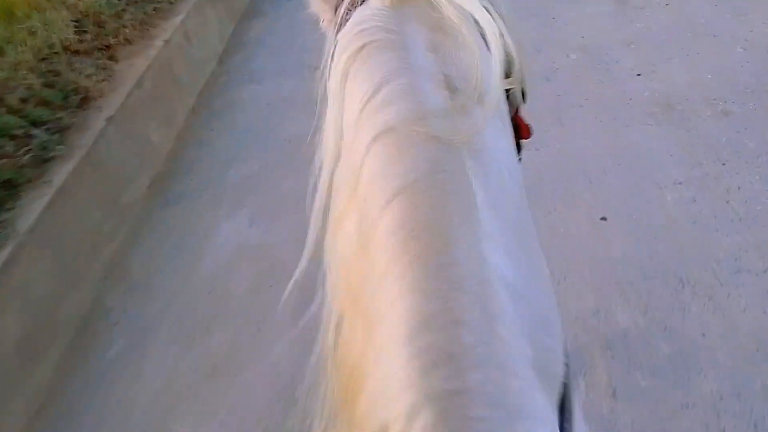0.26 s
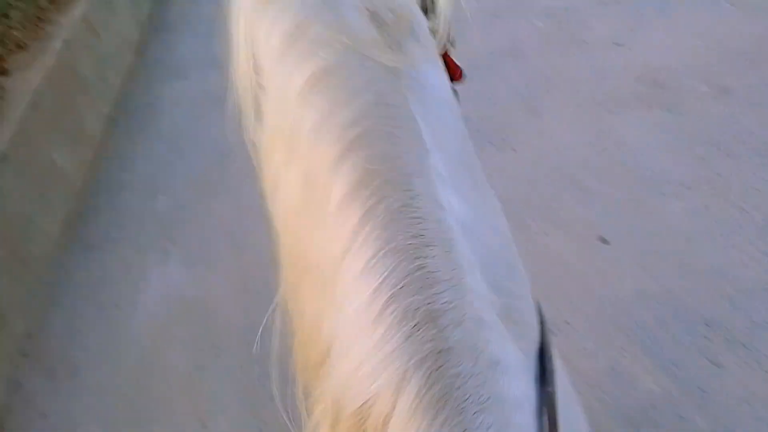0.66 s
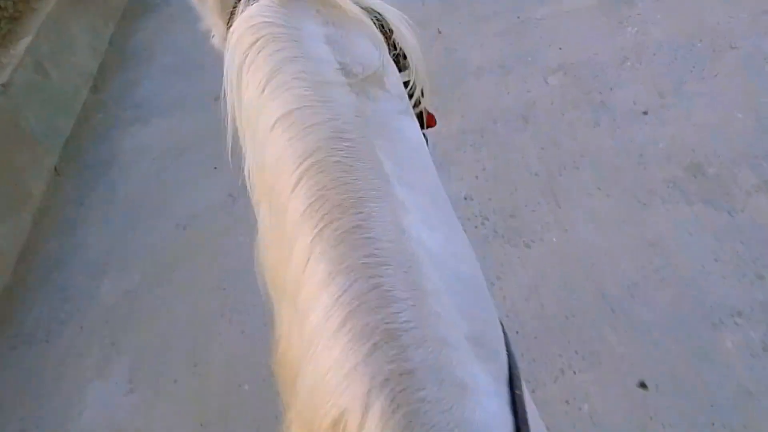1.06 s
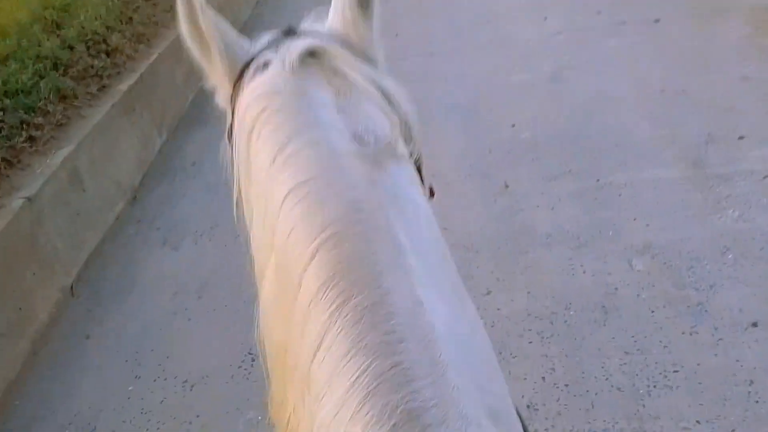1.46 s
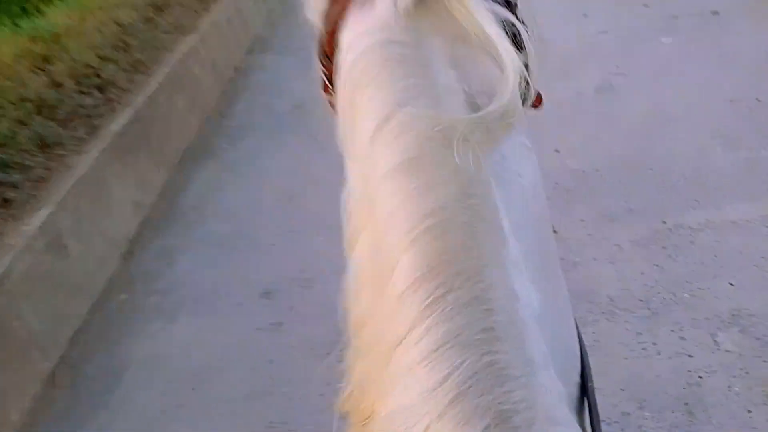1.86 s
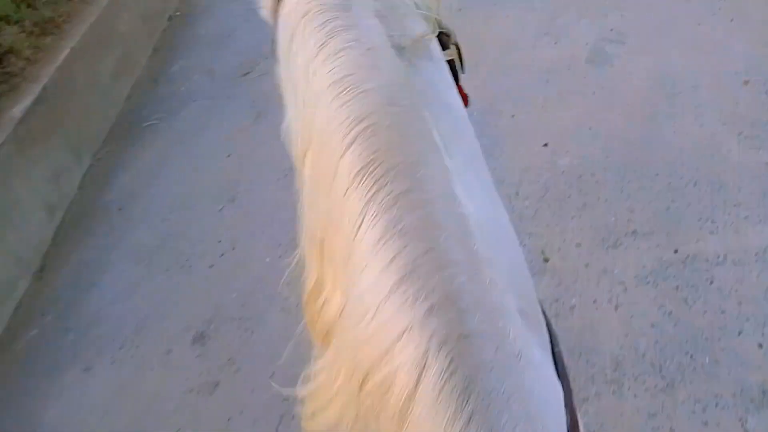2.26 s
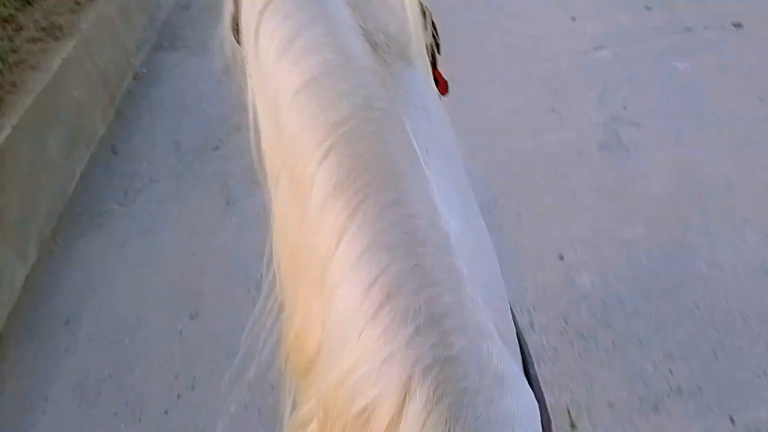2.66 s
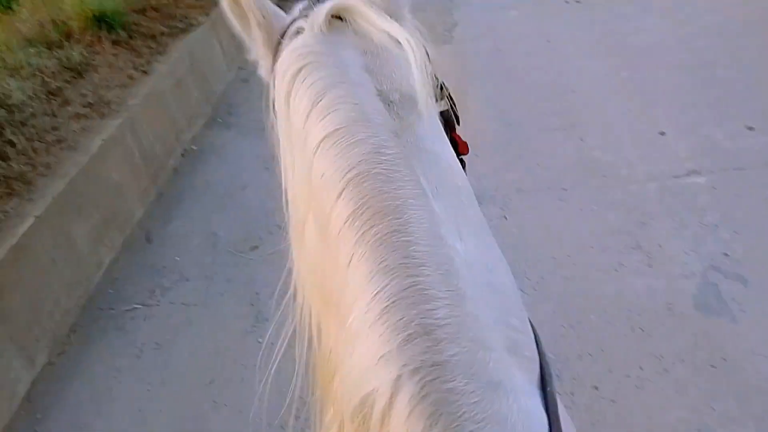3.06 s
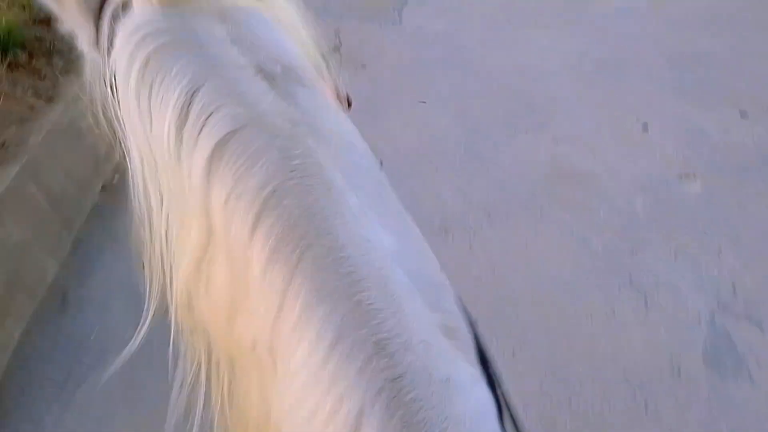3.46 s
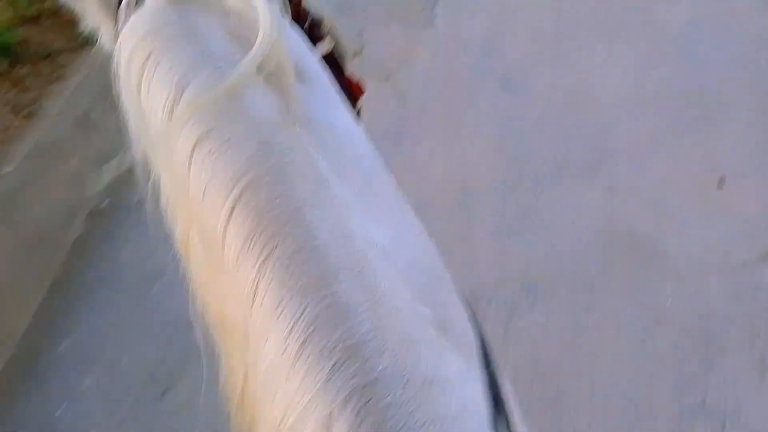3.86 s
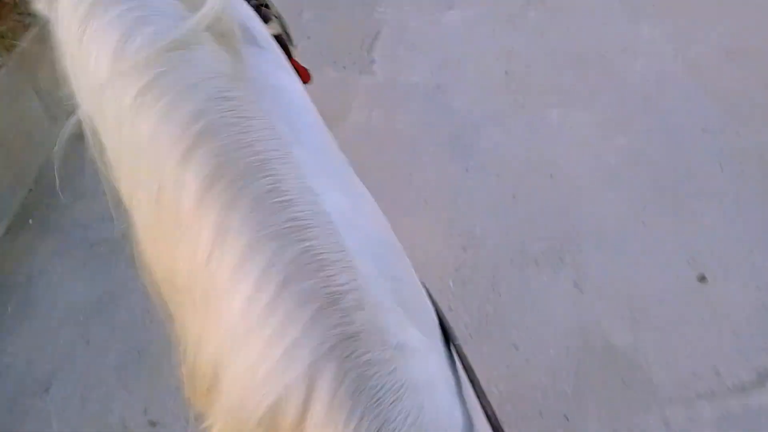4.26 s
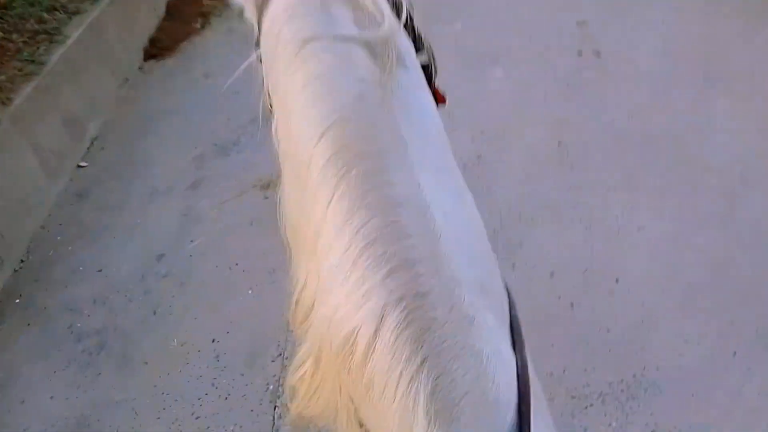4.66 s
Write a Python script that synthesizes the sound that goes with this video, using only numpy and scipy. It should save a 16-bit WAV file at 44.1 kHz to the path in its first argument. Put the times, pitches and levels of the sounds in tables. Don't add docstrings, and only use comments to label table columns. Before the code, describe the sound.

A walking horse's hard hollow hoof clicks over a low puttering engine that slows, then throttles up near the end, amid thumping wind.

```python
import sys
import numpy as np
from scipy import signal
from scipy.fft import rfft, irfft, next_fast_len
from scipy.io import wavfile
from scipy.ndimage import uniform_filter1d

SR = 44100
rng = np.random.default_rng(int(sys.argv[2]) if len(sys.argv) > 2 else 0)


def convert_level_to_amplitude(level_db):
    exponent = np.asarray(level_db, float) / 20
    return 10 ** exponent


def to_wav(sig):
    pcm = np.clip(np.atleast_2d(sig), -1, 1) * 32767
    pcm = np.round(pcm).astype(np.int16)
    wavfile.write(sys.argv[1], SR, pcm.T)


N = 212601
T = np.arange(N) / SR

# start_s, peak_db, ring_hz, hollow_knock_db,
# shoe_edge_db
HOOF_BLOWS = [(0.014, -16, 924, -2.5, -13), (0.189, -16, 850, -1, -35), (0.477, -18, 1160, 0.5, -7),
              (0.944, -16.5, 1020, 5, -2.5), (0.994, -33, 1200, -12, -29), (1.426, -15, 1120, -2.5, -31),
              (1.446, -19, 990, -3, -5), (1.865, -10.5, 1032, 0.5, -8.5), (2.314, -11, 1125, -6, -6.5),
              (2.365, -16.5, 960, -10.5, -4), (2.78, -11, 1040, -5, -41), (3.234, -15.5, 970, 2, -30),
              (3.275, -12, 904, -16.5, -28), (3.687, -11, 990, -2.5, -28), (3.811, -23.5, 800, -11, -24),
              (4.144, -16.5, 936, 2, -15), (4.191, -15, 884, -36.5, -36), (4.609, -21.5, 910, -24, -15.5),
              (2.809, -32, 1000, -16, -30)]
# start_s, peak_db, hollow_knock_db, shoe_edge_db
HOOF_TOUCHES = [(0.106, -35, 9.5, 1), (0.216, -31, 10, 5), (0.53, -27.5, 9, 4), (0.654, -27.5, 11.5, -5),
                (0.685, -24, 3, -6), (0.708, -26.5, -7, -19), (1.088, -40.5, 11, 4), (1.118, -20, -8, -9),
                (1.236, -33, 15.5, -22), (1.281, -28.5, 6.5, 2.5), (1.396, -23.5, 2, -8),
                (1.577, -28, 15, 1), (1.924, -41, 14.5, 1), (2.007, -25, 3.5, -29), (2.455, -30.5, 7, -7),
                (2.657, -24, -7, -5), (2.679, -32.5, 10, -12), (2.699, -24.5, 0, -5.5),
                (2.715, -47, -9, -6), (2.876, -39, 11, -4), (3.035, -26, 2, 0.5), (3.344, -29.5, 8, -19),
                (4.051, -25.5, -12, -1.5), (4.107, -25, -3, -3), (4.282, -23, 0, -8), (4.329, -22, -10, -7)]
RING_T60_S, RING_T60_S_PER_DB = .0068, .0001
TOUCH_HZ, TOUCH_T60_S = 790, 0.0057

# time_s, firings_hz
ENGINE_SPEED = [(0, 34.97), (.6, 32.89), (1.2, 31.85), (2, 29.53), (2.7, 27.96), (2.95, 26.78),
                (3.5, 25.76), (4.03, 25.52), (4.1, 29.9), (4.3, 25.5), (4.55, 25.5), (4.82, 26.1)]
# time_s,
# centre_hz
BOOM_CENTRE = [(0, 136), (.8, 131), (2.6, 114), (3, 122), (3.8, 128), (4.05, 126), (4.2, 149),
               (4.38, 143), (4.6, 140), (4.82, 138)]
# time_s, gain_db
NEARNESS = [(0, -5), (.4, 0), (1.3, -0.5), (2.3, 0), (2.7, -3), (3.05, 0), (3.4, 3), (4, 3.5), (4.4, 4),
            (4.7, 6), (4.82, 7.5)]
# far_level_db, nearness_share (ratio), throttle_gain_db
ENGINE_LAYERS = [
    (-23, 0.94, 7),
    (-32.5, 1.49, 3.5),
    (-36.5, 0.73, 13),
    (-49.5, 2.2, 10),
    (-52.5, 1.97, 6),
]
WEAK_FIRINGS = (3.385, 3.502, 3.62, 3.812, 3.93, 4.047)
WEAK_DB = -8
THROTTLE_S, THROTTLE_RISE_S = 4.06, .1
SWELL_S, SWELL_WIDTH_S, SWELL_DB = 2.31, 0.54, 4.5
SILENCER_HZ, SILENCER_WIDTH_HZ = 309.5, 40.4
# frequency_hz, density_db (per Hz)
CLATTER_COLOUR = [(300, -1), (600, -10.5), (760, -13.0), (930, -0.5), (1200, -13), (1650, -23),
                  (2100, -5.0), (2750, -9.0), (3300, -18.0), (4300, -22.5), (5500, -29.5), (7000, -39.5),
                  (9000, -49), (11000, -37), (15500, -62)]
# frequency_hz, density_db (per Hz)
SNAP_COLOUR = [(3000, -28.5), (4500, -18.5), (5700, 4.5), (7000, -6.5), (9500, -1.5), (12000, -7.5),
               (16000, -22.5)]
# time_s, pitch_hz, level_db
GEAR_WHINE = [
    (2.799, 930, -57.5),
    (3.2, 930, -67),
    (3.4, 918, -45.5),
    (3.7, 913, -47),
    (4, 923, -47.5),
    (4.1, 830, -58),
]

SONG_ANCHORS = [
    (.006, .192, .444, .795, 1.277, 1.871, 1.995, 2.236, 2.78),
    (.713, 1.376, 1.747, 2.193, 2.815, 2.878, 3.366, 3.965, 4.03, 4.333),
    (3.824, 4.382),
    (4.543, 4.79),
]
SONG_LEVELS = [
    (-51.5, -54, -53.5, -54.5, -57.5, -60, -57, -59.5, -66),
    (-64, -64, -64.5, -62, -64.5, -59, -60.5, -60, -56, -60.5),
    (-68, -73),
    (-63.5, -67),
]
PAIR_S, STROKE_GAP_S = .061, .02
LOW_END_S, LOW_END_WIDTH_S, LOW_END_DB = 1.5, 0.41, 8

# start_s, peak_db, length_s, bright_ping_db
GRIT_SCUFFS = [(0.392, -33, 0.014, -21), (0.4, -20.5, 0.0041, -27), (0.412, -40.5, 0.026, -32),
               (0.5246, -33, 0.0052, -25.5), (0.654, -41.5, 0.056, -22), (0.953, -31.5, 0.0067, -27.5),
               (1.8164, -44, 0.008, -11), (2.0255, -39.5, 0.027, -12), (2.039, -37, 0.006, -17),
               (2.3215, -39, 0.017, -17), (2.344, -41, 0.03, -19), (2.5016, -40, 0.021, -9),
               (2.7828, -34.5, 0.017, -23), (3.2494, -45, 0.013, -18), (3.5798, -46.5, 0.011, -12.5),
               (3.6875, -32, 0.0097, -24), (4.3347, -33.5, 0.01, -21), (4.3455, -37, 0.017, -10),
               (4.381, -38, 0.011, -16), (0.002, -30, 0.0068, -26), (0.675, -40.5, 0.017, -20.5)]
# frequency_hz, density_db (per Hz)
GRIT_SPECTRUM = [(100, -17), (400, 15.5), (800, 5.0), (1500, -8.5), (2500, -2.5), (4000, -13),
                 (6000, -23.5), (9000, -31.5), (12000, -26.5), (15500, -56)]

# time_s, level_db
WIND_LEVEL = [(0, -17.5), (.8, -17), (1.15, -20), (1.3, -12.5), (1.45, -18), (1.57, -19.5), (1.72, -20),
              (1.92, -15.5), (2.06, -21), (2.5, -13.5), (2.75, -17), (3.05, -12.5), (3.22, -17),
              (3.37, -13.5), (3.95, -17), (4.07, -13), (4.2, -17.5), (4.5, -12.5)]
# frequency_hz, density_db (per Hz)
WIND_SPECTRUM = [(5, -10.5), (12, -6), (36, 0), (60, -11.5), (90, -8), (130, -16), (200, -26.5),
                 (400, -40.5), (2000, -87)]
# centre_s, signed_height (full scale), length_s
WIND_PUFFS = [(.224, -.62, .0028), (1.094, -.5, .003), (1.288, -.55, .0035), (1.577, -.8, .005),
              (2.371, -.55, .003), (2.511, -.5, .0035), (2.547, -.55, .0035), (2.666, .65, .0035),
              (3.049, -.5, .003), (3.127, .45, .003), (3.348, -.5, .003)]
# frequency_hz, density_db (per Hz)
AIR_COLOUR = [(100, -8.5), (300, 0), (450, -7.0), (600, -23.0), (800, -19), (1000, -20.5), (1600, -32.5),
              (2200, -30.5), (3200, -34.0), (4500, -41.5), (5700, -44.5), (8800, -49.5), (11000, -47.0),
              (13500, -52), (15700, -68)]
AIR_DB = -45


def evened(x):
    return x / np.sqrt(np.mean(x ** 2) + 1e-20)


def steadied(x):
    return x / np.sqrt(uniform_filter1d(x ** 2, size=9000) + 1e-20)


def read(points, hz):
    f, value = np.transpose(points)
    return np.interp(np.log(hz + 1), np.log(f + 1), value)


def course(points):
    return np.interp(T, *np.transpose(points))


def add(mix, s, sound):
    part = mix[max(round(s * SR), 0):][:len(sound)]
    part += sound[:len(part)]


def resonate(x, hz, width):
    turn = np.exp(2j * np.pi * np.cumsum(hz * np.ones(len(x))) / SR)
    r = np.exp(-np.pi * width / SR)
    return 2 * (turn * signal.lfilter([1 - r], [1, -r], x / turn)).real


def noise(colour):
    size = next_fast_len(N)
    gain = convert_level_to_amplitude(read(colour, np.fft.rfftfreq(size, 1 / SR)))
    return evened(irfft(rfft(rng.standard_normal(size)) * gain, size)[:N])


def causal(colour, size=1024):
    level_db = np.maximum(read(colour, abs(np.fft.fftfreq(size, 1 / SR))), -90)
    log_gain = np.log(convert_level_to_amplitude(level_db))
    click = np.fft.ifft(np.exp(np.conj(signal.hilbert(log_gain)))).real[:size // 2]
    return click / abs(click).max()


def hooves():
    dry, t = np.zeros(N), np.arange(4000) / SR
    steps = [(*row, RING_T60_S - RING_T60_S_PER_DB * row[3]) for row in HOOF_BLOWS]
    steps += [(s, db, TOUCH_HZ, knock_db, edge_db, TOUCH_T60_S) for s, db, knock_db, edge_db in HOOF_TOUCHES]
    luck = rng.random((len(steps), 4))
    for (s, db, hz, knock_db, edge_db, t60), (a, b, c, d) in zip(steps, luck):
        t60 = np.clip(t60, .003, .022)
        ring_fade = convert_level_to_amplitude(-60 * t / t60) + convert_level_to_amplitude(-28 - 60 * t / .06)
        ring = np.sin(2 * np.pi * hz * t) * ring_fade
        knock = convert_level_to_amplitude(knock_db) * np.sin(2 * np.pi * (500 + 160 * a) * t) * convert_level_to_amplitude(-60 * t / (1.24 * t60))
        edge = -convert_level_to_amplitude(edge_db + 1.5) * np.sin(2 * np.pi * (1700 + 500 * b) * t) * convert_level_to_amplitude(-60 * t / (.5 * t60))
        blow = (ring + knock + edge) * (1 - np.exp(-t / .0005)) ** 2
        blow -= convert_level_to_amplitude(edge_db - 11) * np.exp(-((t - .0006) / 0.0001) ** 2)
        add(blow, 0.001588 + 0.0013 * c, 0.3 * blow[:-400].copy())
        belly = .4 * convert_level_to_amplitude(min(db + 20, 0))
        add(blow, .0048 + .002 * d, belly * blow[:-400].copy())
        add(dry, s, convert_level_to_amplitude(db + 10.5) * blow)
    scatter = rng.standard_normal(4000) * convert_level_to_amplitude(-60 * t / 0.089) * (t > .003)
    scatter = np.diff(scatter / np.linalg.norm(scatter))
    both = dry + signal.oaconvolve(dry, scatter)[:N]
    return signal.sosfilt(signal.butter(3, 4300, fs=SR, output="sos"), both)


def engine():
    turns = np.cumsum(course(ENGINE_SPEED)) / SR + 0.291
    cycle = turns.astype(int)
    boom_hz, near_db = course(BOOM_CENTRE), course(NEARNESS)
    throttle = np.clip((T - THROTTLE_S) / THROTTLE_RISE_S, 0, 1)
    levels = [db + share * near_db + open_db * throttle for db, share, open_db in ENGINE_LAYERS]
    levels[0] = levels[0] + SWELL_DB * np.exp(-((T - SWELL_S) / SWELL_WIDTH_S) ** 2)

    strength = convert_level_to_amplitude(.9 * rng.standard_normal(200))[cycle]
    weak = np.isin(cycle, np.round(np.interp(WEAK_FIRINGS, T, turns - .1)))
    strength = strength * convert_level_to_amplitude(WEAK_DB * weak)
    firings = np.diff(np.floor(turns), prepend=0) * strength
    kicks = np.convolve(firings, np.hanning(60))[:N]
    gas = np.exp(-(turns % 1) / .4) * strength
    rough = kicks + .035 * gas * rng.standard_normal(N)
    even = np.convolve(firings / convert_level_to_amplitude(.6 * WEAK_DB * weak), np.hanning(60))[:N]

    boom = resonate(resonate(even, boom_hz, 14), boom_hz, 60)
    bark = resonate(resonate(rough, 1.9 * boom_hz, 70), 1.9 * boom_hz, 87)
    silencer = resonate(resonate(kicks, SILENCER_HZ, SILENCER_WIDTH_HZ), SILENCER_HZ, 80)
    rasp = resonate(resonate(rough, 2.8 * boom_hz, 80), 3.15 * boom_hz, 130)
    shake = np.exp(-((turns - .22) % 1) / .3) * strength
    clatter = noise(CLATTER_COLOUR) * (0.41 + uniform_filter1d(shake, size=150))
    snap = noise(SNAP_COLOUR) * (.25 + uniform_filter1d(shake ** 2, size=200))
    clatter += convert_level_to_amplitude(-24.5 + 0.72 * (levels[4] + 41)) * snap
    layers = (boom, -bark, silencer, rasp, clatter)
    return sum(convert_level_to_amplitude(db) * steadied(x) for db, x in zip(levels, layers))


def whine():
    s, hz, db = np.transpose(GEAR_WHINE)
    hz = np.interp(T, s, hz)
    tone = resonate(resonate(rng.standard_normal(N), hz, 16), hz, 40)
    tone /= np.sqrt(uniform_filter1d(tone ** 2, size=1500))
    third = evened(resonate(rng.standard_normal(N), 2.7 * hz, 90))
    return (tone + convert_level_to_amplitude(-13.0) * third) * convert_level_to_amplitude(np.interp(T, s, db, -120, -120))


def crickets():
    out, u = np.zeros(N), np.linspace(0, 1, 580)
    for anchors, levels in zip(SONG_ANCHORS, SONG_LEVELS):
        counted = np.cumsum(np.round(np.diff(anchors, prepend=anchors[0]) / PAIR_S))
        starts = np.interp(np.arange(counted[-1] + 1), counted, anchors)
        strokes = np.add.outer(starts, [0, STROKE_GAP_S]).ravel()
        for s, (a, b, c) in zip(strokes, rng.standard_normal((len(strokes), 3))):
            hz = (7950 + 70 * a) - (1900 + 150 * b) * u ** 1.6
            db = np.interp(s, anchors, levels) + 0.9 * c + 10.5
            low_end = np.exp(-((u - .85) / .15) ** 2 - ((s - LOW_END_S) / LOW_END_WIDTH_S) ** 2)
            tilt_db = LOW_END_DB * low_end - 13 * u
            envelope = convert_level_to_amplitude(db + tilt_db) * np.sin(np.pi * u ** 1.46) ** 0.5
            add(out, s, envelope * np.sin(2 * np.pi * np.cumsum(hz) / SR))
    out *= 1 + 0.26 * evened(uniform_filter1d(rng.standard_normal(N), size=60))
    blur = rng.standard_normal(3000) * np.exp(-np.arange(3000) / SR / 0.026)
    return out + convert_level_to_amplitude(-9) * signal.oaconvolve(out, blur / np.linalg.norm(blur))[:N]


def grit():
    ticks, pings, hiss = np.zeros((3, N))
    luck = rng.random((len(GRIT_SCUFFS), 2, 2600))
    for (s, db, length, ping_db), (when, size) in zip(GRIT_SCUFFS, luck):
        fade = convert_level_to_amplitude(db) * np.exp(-np.arange(2600) / SR / max(length, .002))
        clump = (when < 700 / SR) * size ** 3.0
        clump[40] = 0.52
        add(ticks, s, fade * clump)
        add(pings, s, convert_level_to_amplitude(ping_db) * fade * clump)
        add(hiss, s, fade)
    tick = signal.oaconvolve(ticks, causal(GRIT_SPECTRUM))[:N]
    ping = resonate(resonate(pings, 8400, 1800), 9200, 2600)
    scuff = hiss * noise(GRIT_SPECTRUM)
    return convert_level_to_amplitude(19.0) * tick + convert_level_to_amplitude(14.5) * ping + convert_level_to_amplitude(-5.5) * scuff


def wind():
    gusts = noise(WIND_SPECTRUM)
    gusts /= np.sqrt(uniform_filter1d(gusts ** 2, size=5000) + 0.11)
    out = gusts * convert_level_to_amplitude(course(WIND_LEVEL))
    for s, height, length in WIND_PUFFS:
        u = (T - s) / length
        out = out * (1 - .7 * np.exp(-u ** 2 / 8))
        out = out + 1.1 * height * np.cos(1.7 * u) * np.exp(-u ** 2 / 5)
    return out


def air():
    frames, hz = N // 128 + 5, np.fft.rfftfreq(512, 1 / SR)
    a, b, patches = rng.standard_normal((frames, 257, 3)).T
    patches = uniform_filter1d(uniform_filter1d(patches, size=5, axis=0), size=16, axis=1)
    z = (a + 1j * b) * convert_level_to_amplitude(read(AIR_COLOUR, hz)[:, None] + 2.5 * evened(patches))
    wash = signal.istft(z, nperseg=512, noverlap=384)[1][:N]
    top = signal.sosfilt(signal.butter(4, 500, "high", fs=SR, output="sos"), wash)
    return convert_level_to_amplitude(AIR_DB) * wash / np.std(top)


def scene():
    return (hooves() + engine() + whine() + crickets() + grit() + wind() + air())[None]


def roll_off(x):
    return signal.sosfilt(signal.butter(12, 15830, fs=SR, output="sos"), x)


def record(dry):
    limited = np.tanh(dry * .9) / .9
    mix = limited * np.minimum(T / .004, 1)
    return roll_off(mix)


dry = scene()
out = record(dry)
to_wav(out)
```